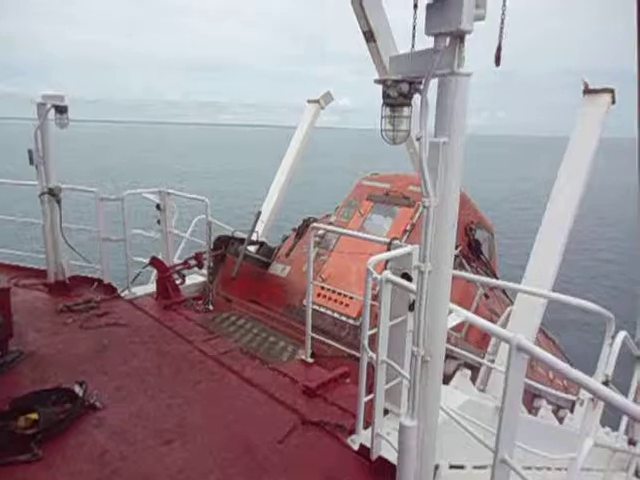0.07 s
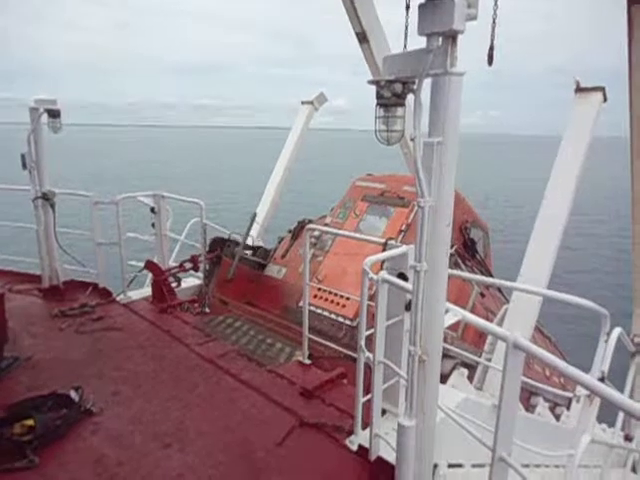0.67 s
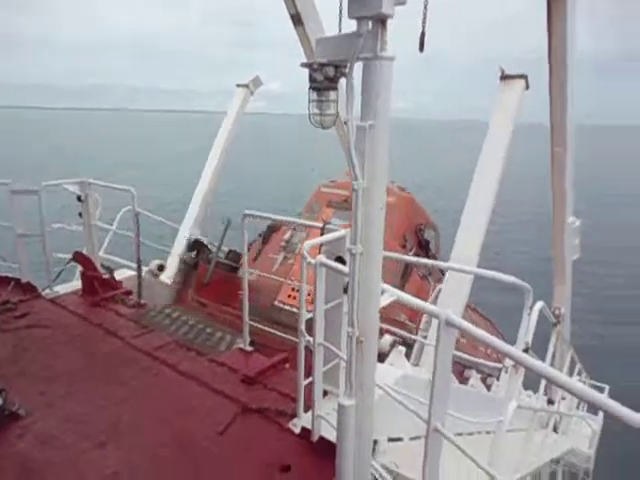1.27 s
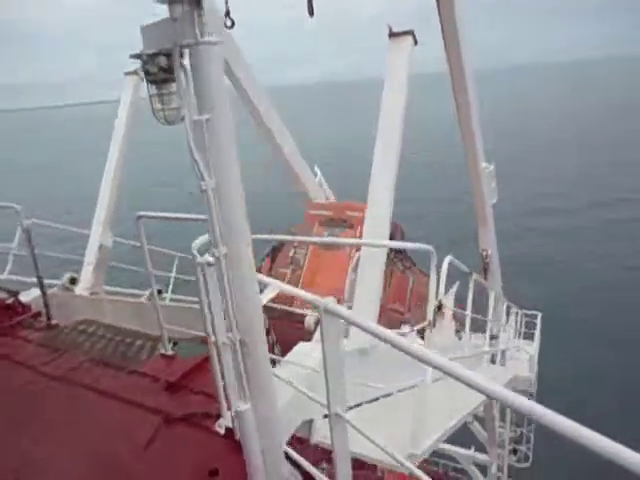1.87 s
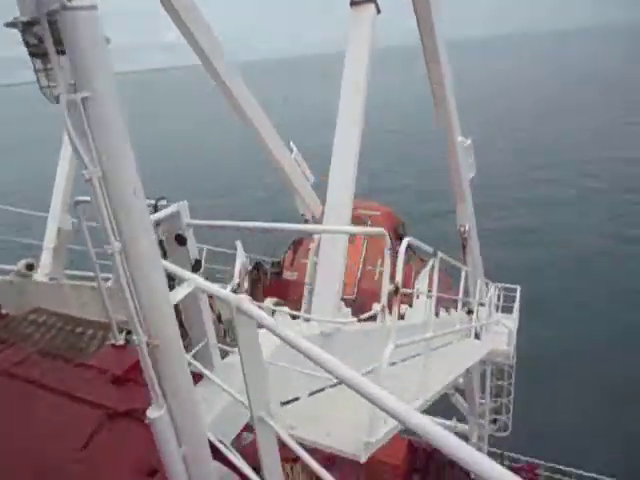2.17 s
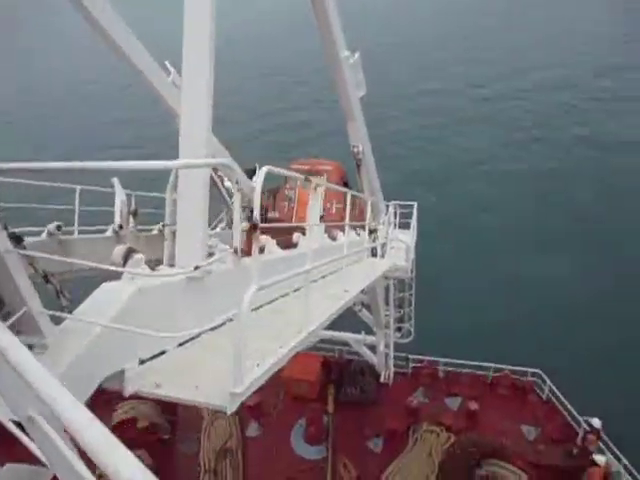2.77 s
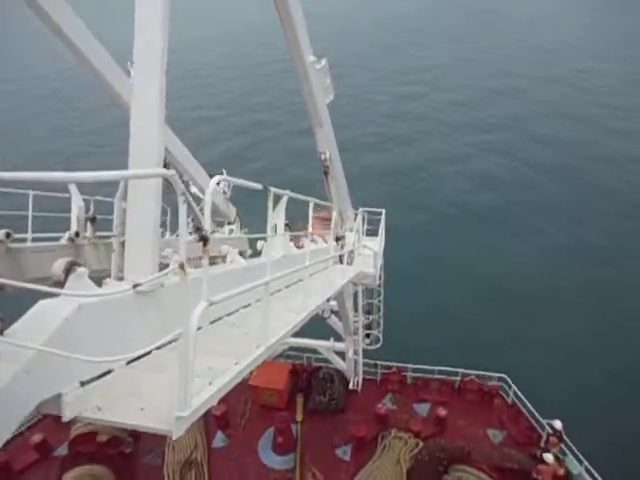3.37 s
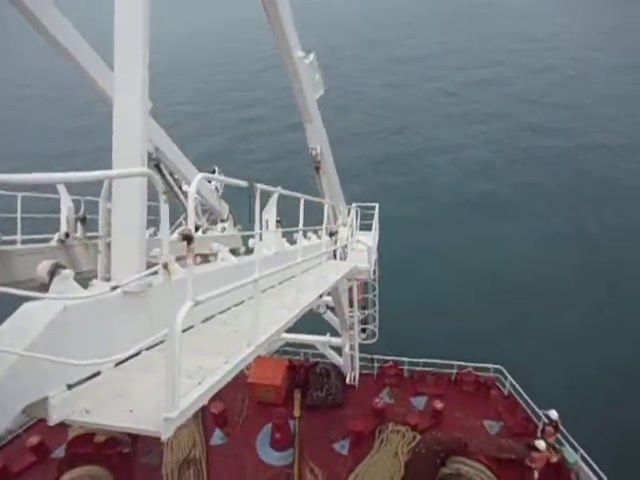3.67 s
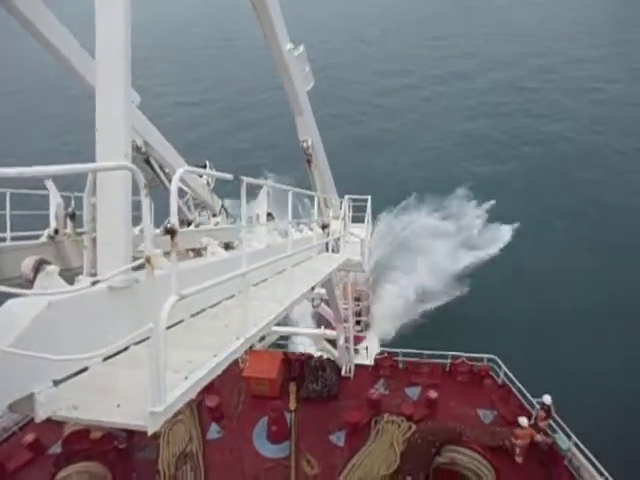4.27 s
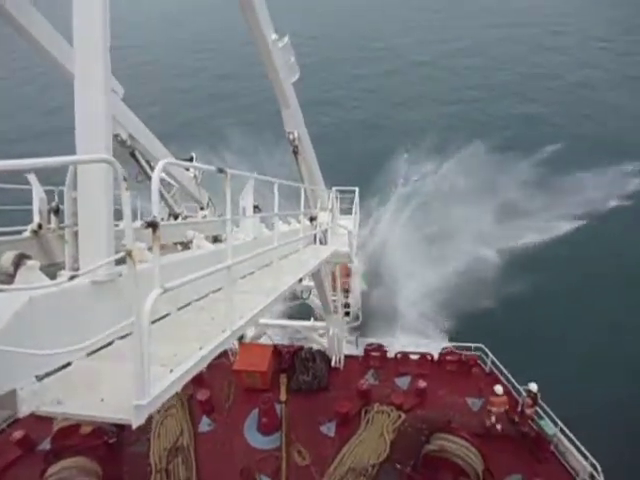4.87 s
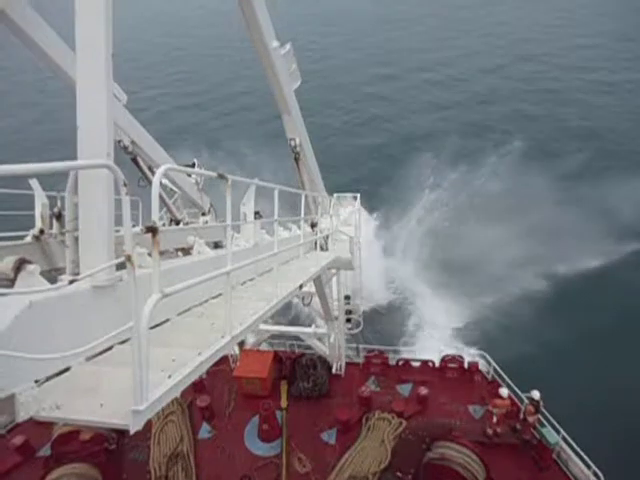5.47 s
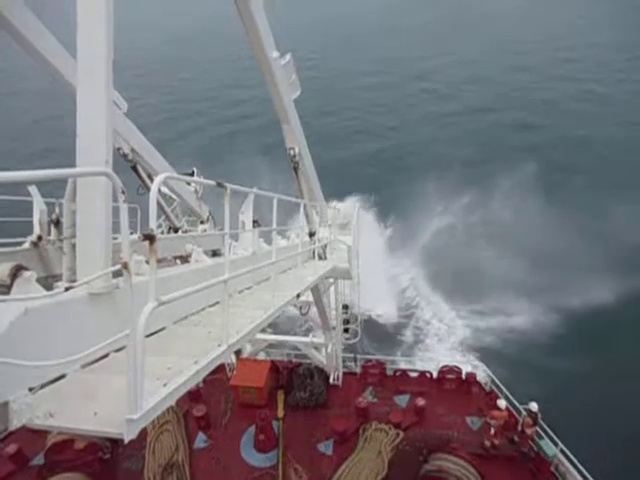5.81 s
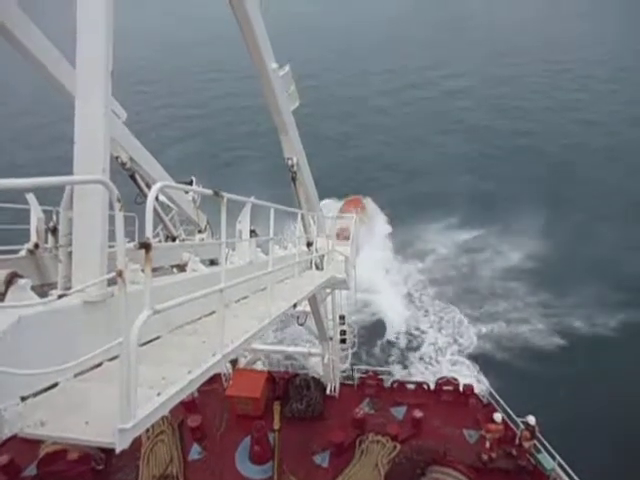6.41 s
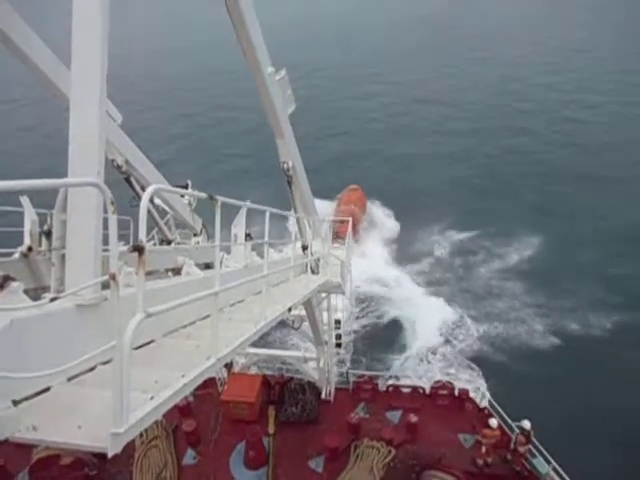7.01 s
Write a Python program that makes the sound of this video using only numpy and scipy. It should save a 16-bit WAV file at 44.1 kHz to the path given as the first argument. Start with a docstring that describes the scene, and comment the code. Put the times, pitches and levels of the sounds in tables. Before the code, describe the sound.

A low rush and short steel groans lead to a sharp clang and several smaller clanks as a lifeboat is released from a ship's stern. A rolling rumble builds, surges and fades as the boat drops. It strikes the water with a cluster of slaps and thuds, then spray falls and white water churns. Ship engines hum throughout, all heard from the deck through a small, slightly distorting microphone with little treble.

```python
"""A free-fall lifeboat is launched from a ship's stern, heard on deck through a small overloading camera.
Over the drone of the ship come a louder low rush of deck noise and groans of steel. The latch knocks, the
hook flies open with a clang as the rush fades, and loose steel clanks, each impact exciting the modes of
the metal. The hull rumbles down the ramp on its rollers, falls in near silence and slams into the sea.
Last, spray rains back as countless small impacts while white water churns behind the boat."""
import sys
import numpy as np
from scipy import signal
from scipy.fft import rfft, irfft, next_fast_len
from scipy.io import wavfile
from scipy.ndimage import uniform_filter1d, map_coordinates

SR = 44100
rng = np.random.default_rng(int(sys.argv[2]) if len(sys.argv) > 2 else 0)


def store_pcm(level_fs):
    """Save levels as 16-bit WAV."""
    pcm = np.round(np.clip(level_fs, -1, 1) * 32767).astype(np.int16)
    wavfile.write(sys.argv[1], SR, np.atleast_2d(pcm).T)


N = 319725
TIME = np.arange(N) / SR

# Engine lines. Each row: frequency in Hz, level in dB.
ENGINE_LINES = [(69, -44), (153, -44.5), (236, -42), (352, -49.5)]
# Noise spectra. Each row: frequency in Hz, relative spectral density in dB.
MACHINERY_SPECTRUM = [(15, -19), (28, -8), (45, 0.5), (70, -24.5), (110, -7.5), (160, -4), (250, -10.5),
                      (330, -19.5), (500, -15), (900, -19.5), (1450, -21), (2200, -36), (3600, -39),
                      (6000, -47.5)]
CHURN_SPECTRUM = [(15, -43), (25, -8.5), (37, -8), (76, 3), (120, 0), (204, -2), (238, 1.5), (288, -5),
                  (399, -9.5), (473, -7.5), (763, -12.5), (924, -10.5), (2140, -22.5), (2400, -26),
                  (3120, -40.5), (5280, -120)]
SPRAY_SPECTRUM = [(900, -24.5), (1800, -7.5), (2600, 3.5), (3500, 1.5), (5100, -1), (6500, -7)]
DECK_RUSH_SPECTRUM = [(15, -44), (25, -14), (70, 0), (311, -6), (835, -19), (1740, -25), (4990, -45),
                      (6000, -61), (7800, -91), (13200, -120)]
RUMBLE_SPECTRUM = [(15, -22), (30, 0), (48, -13.5), (68, -1), (110, -8.5), (170, -16.5), (250, -15.5),
                   (340, -24), (600, -30), (1500, -75)]
ROLLER_SPECTRUM = [(100, -13.5), (250, 1.5), (420, 1), (800, 2), (1000, -1.5), (1350, -2.5), (1700, -11.5),
                   (2200, -20), (3500, -30), (6000, -46.5)]
SCRAPE_SPECTRUM = [(800, -20), (1800, 0), (2700, 2.5), (4000, -2.5), (5200, -8), (6500, -11.5)]
SLAP_SPECTRUM = [(100, -11.5), (300, 4), (600, 6.5), (1000, 10), (1600, -3.5), (2600, -0.5), (4000, -7),
                 (5200, -9.5), (6500, -12)]
BOOM_SPECTRUM = [(25, -6.5), (75, 3), (150, 3.5), (220, 5.5), (320, -3), (520, -7.5), (1000, -12.5),
                 (1700, -24), (4000, -30)]
CRACK_SPECTRUM = [(150, -16), (500, 5), (1000, -2.5), (1700, 3.5), (2300, 2), (3300, -3), (4200, -2),
                  (5300, -9), (6500, -6.5)]
THUD_SPECTRUM = [(25, -20.5), (80, 1), (160, -1), (245, 9), (330, -5), (520, -4.5), (750, -13), (1400, -16),
                 (4000, -48.5)]
PLATE_SPECTRUM = [(200, -16.5), (400, 5.5), (600, -0.5), (800, -15), (1300, -8), (1800, -5.5),
                  (3000, -16.5), (6000, -49.5)]  # the crowded modes of the deck plates
# Normal modes of the steel. Each row: frequency in Hz, relative level in dB, 60 dB decay time in seconds.
HOOK_MODES = [(1613, -16, .22), (2027, -4, .31), (2100, -2, .34), (3152, -1, .32), (3304, -14, .32),
              (3921, -17, .23), (4313, -10, .23), (5055, -27, .45), (5970, -27, .5)]
RAMP_MODES = [(406, -3, .75), (451, -10, .5), (526, -1, .5), (680, -8, .65), (742, -11, .55),
              (883, -10, .35), (1157, -9, .3), (1715, -10, .3), (2283, -12, .25), (3505, -19, .45),
              (4540, -25, .4), (4807, -16, .3)]
SHACKLE_MODES = [(1077, -6, .3), (1583, -2, .5), (2019, -6, .25), (2825, -6, .3), (2895, -4, .25),
                 (3145, -10, .25), (4298, -17, .4), (4430, -10, .4)]
# Groans and squeaks of steel. Each row: centre in seconds, frequency in Hz, level in dB, width in seconds.
GROANS = [(0.475, 560, -22, 0.035), (0.505, 565, -16, 0.028), (0.775, 600, -10, 0.045),
          (0.955, 600, -17.5, 0.018), (1.017, 470, -21.5, 0.036), (1.047, 480, -22, 0.035),
          (4.16, 3330, -49, 0.06), (4.703, 3420, -47, 0.07)]
# The latch gives way under load. Each row: start in seconds, relative levels of crack and thud in dB.
LATCH_KNOCKS = [(0.412, -39, -22), (0.466, -36, -25), (0.498, -30, -24), (0.728, -32, -9), (0.7339, -7, -5),
                (0.7515, -17, 0), (0.763, -13, -13), (0.803, -2.5, 6)]
# Loose steel hits the ramp. Each row: start in seconds, then relative levels in dB of the crack
# and of the ringing of hook, ramp and shackle.
STEEL_CLANKS = [(0.878, -20, -12.5, -42, -36), (0.896, -28.5, -31, -36, -45),
                (1.0472, -23.5, -38, -37, -50), (1.0821, -14.5, -26, -17.5, -49),
                (1.202, -16.5, -32, -27.5, -28), (1.221, -20, -28, -38, -33),
                (1.2676, -15.5, -26.5, -17.5, -36), (1.345, -55, -58, -42, -31),
                (1.3805, -28, -48, -28, -25)]
# Runs of light ticking. Each row: start in seconds, length in seconds, relative level in dB.
TICK_RUNS = [(1.687, 0.47, -29.5), (3.249, 0.03, -28.5), (3.811, 0.22, -37), (4.576, 0.28, -29)]
# Single dry ticks during the slide. Each row: start in seconds, relative level in dB.
SINGLE_TICKS = [(2.156, -27), (2.1744, -25), (2.2116, -20), (2.3136, -28), (2.561, -23), (3.1706, -32)]
# The hull bumps over the ramp. Each row: centre in seconds, rumble level in dB, scrape level in dB.
HULL_BUMPS = [(1.9, -24, -58), (2.18, -18, -48), (2.43, -21, -42), (2.55, -17, -39), (2.63, -28, -40),
              (2.72, -19, -48), (3.16, -21, -43)]
# The hull meets the water. Each row: start in seconds, slap level in dB, boom level in dB.
WATER_IMPACTS = [(4.03, -32, -30), (4.0929, -18.5, -33), (4.2745, -28.5, -32), (4.3144, -26, -22.5),
                 (4.3525, -15, -18), (4.3698, -18.5, -21), (4.379, -18, -19), (4.392, -25, -24),
                 (4.492, -25.5, -29)]
# The shackle clinks on the emptied ramp. Each row: start in seconds, relative level in dB.
SHACKLE_CLINKS = [(4.379, -31), (4.492, -40)]
# Frequency response of the camera. Each row: frequency in Hz, gain in dB.
PASSBAND = [(10, -3), (25, 0.5), (5200, -1), (5550, -11), (5950, -18), (6350, -35.5), (6700, -82.5)]

# Swells. Each gives: start and end of the hold in seconds, level in dB, rise and fall in dB per second.
DECK_RUSH = (0.3, 0.75, -22, 40, 36)  # a low rush of deck noise that fades at the clang
CREEP = (1.1, 1.4, -34, 120, 130)  # the runners grate as the boat starts to move
DRUMMING = (2.45, 2.72, -19.3, 7.5, 19)  # the hull's weight passes down the ramp
SCRAPING = (2.53, 2.62, -41.3, 12, 24)  # grit under the runners
ENTRY = (4.06, 4.5, -47.8, 200, 21)  # the sheet of water thrown up by the bow
PLUME = (6.17, 6.66, -34.4, 9.3, 16.5)  # spray raining back
WAKE = (6.2, 7.25, -23.7, 5.5, 5)  # white water behind the boat


def amp(db):
    """Amplitude grows tenfold for every 20 dB."""
    return 10 ** (np.asarray(db) / 20)


def unit(x):
    """Normalisation to an rms of 1."""
    return x / np.sqrt(np.mean(x ** 2) + 1e-20)


def together(*gains):
    """Incoherent sounds add in power."""
    return np.sqrt(sum(gain ** 2 for gain in gains))


def wobble(rate):
    """Smooth random modulation: a spline through rate knots a second."""
    return map_coordinates(rng.standard_normal(int(N * rate / SR) + 4), [TIME * rate])


def swell(shape):
    """Exponential growth, a hold and exponential decay: straight lines in dB."""
    start, end, db, rise, fall = shape
    return amp(db - rise * np.maximum(start - TIME, 0) - fall * np.maximum(TIME - end, 0))


def hump(centre, width):
    """A Gaussian envelope around one moment."""
    return np.exp(-np.pi * np.minimum(np.abs(TIME - centre) / width, 10) ** 2)


def bursts(times, levels, t60, attack):
    """Envelope of damped impacts: each rises quickly and decays exponentially, and their powers add."""
    t = np.arange(int(SR * min(1.5 * t60, 1))) / SR
    shape = (amp(-60 * t / t60) * (1 - np.exp(-t / attack))) ** 2
    power = np.zeros(N + SR)
    for start, db in zip(times, levels):
        power[round(start * SR):][:len(t)] += amp(db) ** 2 * shape
    return np.sqrt(power[:N])


def filtered(x, response):
    """Linear filtering multiplies the spectrum by a frequency response."""
    size = next_fast_len(N + SR // 2)
    return irfft(rfft(x, size) * response(np.fft.rfftfreq(size, 1 / SR)), size)[:N]


def colour(x, spectrum):
    """Spectral shaping by a curve of dB against log frequency."""
    knots_hz, db = np.transpose(spectrum)
    return filtered(x, lambda hz: amp(np.interp(np.log(hz + 1), np.log(knots_hz), db)))


def rush(spectrum, patchy_db):
    """Coloured noise of rms 1, modulated in random patches of time and frequency."""
    cells = signal.stft(rng.standard_normal(N), nperseg=512)[2]
    patches = uniform_filter1d(rng.standard_normal(cells.shape), size=4, axis=0)
    patches = uniform_filter1d(patches, size=10, axis=1)
    noise = signal.istft(cells * amp(patchy_db * unit(patches)), nperseg=512)[1][:N]
    return unit(colour(noise, spectrum))


def grains(spectrum, rate, scatter_db):
    """Shot noise of rms 1: tiny impacts of random size at random moments."""
    sizes = rng.standard_normal(N) * amp(scatter_db * np.clip(rng.standard_normal(N), -2, 2))
    struck = rng.random(N) < rate / SR
    return unit(colour(sizes * struck, spectrum))


def ring(modes, times, levels, waver_rad=0.5, waver_per_s=28):
    """Modal vibration: each blow gives every mode a random share of energy, lost at the mode's own rate."""
    out = np.zeros(N)
    live = slice(int(min(times) * SR), int((max(times) + 1) * SR))
    t = TIME[live] - min(times)
    for hz, db, t60 in modes:
        strengths = levels + db + rng.standard_normal(len(times))
        envelope = bursts(times, strengths, t60, attack=0.0033)[live]
        # loose steel never rings quite purely
        waver = waver_rad * np.interp(t * waver_per_s, np.arange(128), rng.standard_normal(128))
        out[live] += envelope * np.sin(2 * np.pi * (hz * t + rng.random()) + waver)
    return out


def ship():
    """Machinery and ventilation radiate broadband noise, with wavering spectral lines from the engine."""
    hum = np.zeros(N)
    for hz, db in ENGINE_LINES:
        peak = np.sqrt(2) * amp(db + 2 * wobble(5))
        hum += peak * np.sin(2 * np.pi * hz * TIME + 0.9 * wobble(7))
    return hum + amp(-33.5) * rush(MACHINERY_SPECTRUM, patchy_db=0.5)


def splash(touch_s=4.05, rise_db_per_s=250):
    """Turbulent white water churns low, while the impacts of countless drops merge into a hiss."""
    afloat = amp(-rise_db_per_s * np.maximum(touch_s - TIME, 0))
    entry = swell(ENTRY)
    churn_gain = together(amp(16) * entry, afloat * swell(WAKE)) * amp(0.28 * wobble(12))
    churn = churn_gain * rush(CHURN_SPECTRUM, patchy_db=0.4)
    hiss = amp(0.5) * rush(SPRAY_SPECTRUM, patchy_db=1)
    drops = amp(-4.5) * grains(SPRAY_SPECTRUM, rate=3600, scatter_db=1)
    spray_gain = together(entry, afloat * swell(PLUME)) * amp(0.43 * wobble(16))
    return churn + spray_gain * (hiss + drops)


def groans():
    """Stick-slip friction under a shifting load gives short notes with weak harmonics."""
    out = np.zeros(N)
    waver = 0.5 * wobble(70)
    for centre, hz, db, width in GROANS:
        live = np.abs(TIME - centre) < 2 * width
        phase = 2 * np.pi * hz * TIME[live] + waver[live]
        note = np.sin(phase) + amp(-24.5) * np.sin(2 * phase) + amp(-17) * np.sin(3 * phase)
        out[live] += amp(db) * hump(centre, width)[live] * note
    return out


def ticks(gap_s=0.0627):
    """Brief transients have broad spectra: dry ticks in even runs, and single, mostly louder ones."""
    even = [(start + lag, db + rng.standard_normal())
            for start, length, db in TICK_RUNS for lag in np.arange(0, length, gap_s)]
    times, levels = np.transpose(even + SINGLE_TICKS)
    return bursts(times, levels - 3.5, t60=0.036, attack=0.0005) * rush(SCRAPE_SPECTRUM, patchy_db=1)


def roller_gain(start_s=1.66, full_speed_s=2.36, edge_s=2.92, db_per_decade=26, run_down_db_per_s=12):
    """Rolling noise grows as a power of speed, surges as the boat tips off the ramp, then runs down."""
    speed = np.clip((TIME - start_s) / (full_speed_s - start_s), 1e-4, 1)
    past_edge = np.maximum(TIME - edge_s, 0)
    unload_db = 1.2 * np.minimum(past_edge / 0.2, 1)
    rolling = amp(-26.7 + db_per_decade * np.log10(speed) - unload_db - run_down_db_per_s * past_edge)
    surge = amp(-24) * hump(edge_s, width=0.27)  # the last rollers carry the whole boat
    return together(rolling, surge)


def slide():
    """After a low rush of deck noise, rolling and friction: the hull drums, rollers roar, grit scrapes."""
    creep = swell(CREEP)
    jolts = sum(amp(db) * hump(centre, width=0.08) for centre, db, _ in HULL_BUMPS)
    scuffs = sum(amp(db) * hump(centre, width=0.08) for centre, _, db in HULL_BUMPS)
    deck_rush = swell(DECK_RUSH) * rush(DECK_RUSH_SPECTRUM, patchy_db=1.5)
    rumble = together(swell(DRUMMING), jolts) * rush(RUMBLE_SPECTRUM, patchy_db=0.5)
    roar = together(creep, roller_gain()) * rush(ROLLER_SPECTRUM, patchy_db=1.4)
    grit = grains(SCRAPE_SPECTRUM, rate=9000, scatter_db=3)
    scrape = together(amp(-7) * creep, swell(SCRAPING), scuffs) * grit
    judder_db = 1.15 * wobble(35)  # all four flicker in level together
    return amp(judder_db) * (deck_rush + rumble + roar + scrape)


def slam():
    """Water impact: the bow slaps and the belly booms, while the shackle clinks on the ramp."""
    times, slap_db, boom_db = np.transpose(WATER_IMPACTS)
    direct = bursts(times, slap_db, t60=0.04, attack=0.0005)
    echo = bursts(times, slap_db - 21, t60=0.51, attack=0.011)  # from the ship's stern
    slap = (direct + echo) * rush(SLAP_SPECTRUM, patchy_db=2)
    boom = bursts(times, boom_db, t60=0.28, attack=0.001) * rush(BOOM_SPECTRUM, patchy_db=0.5)
    return slap + boom + ring(SHACKLE_MODES, *np.transpose(SHACKLE_CLINKS))


def hook_chatter(count=5, start_s=0.8111, gap_s=0.0122, scatter_s=0.001, loss_db=6.2):
    """Inelastic rebound: the hook loses energy at each contact with its stop. One row per contact."""
    contact = np.arange(count)
    times = start_s + gap_s * contact + scatter_s * rng.standard_normal(count) * (contact > 0)
    first_db = np.array([19, 1, -28, 6, -27])  # crack, thud, ramp, hook, shackle
    return np.column_stack([times, first_db - loss_db * contact[:, None]])


def release():
    """Impact excitation: latch, hook and loose steel crack, thud through the deck and ring the metal."""
    knocks = [(start, crack, thud, crack - 9) for start, crack, thud in LATCH_KNOCKS]
    clanks = [(start, crack, crack - 3, ramp, hook, shackle)
              for start, crack, hook, ramp, shackle in STEEL_CLANKS]
    blows = np.vstack([hook_chatter(), clanks])
    blow_times, *_, hook_db, shackle_db = blows.T
    hook = ring(HOOK_MODES, blow_times, hook_db)
    shackle = ring(SHACKLE_MODES, blow_times, shackle_db + 1.5)
    # the latch's dull knocks join in for all but the ringing of hook and shackle
    times, crack_db, thud_db, ramp_db = np.vstack([knocks, blows[:, :4]]).T
    contact = bursts(times, crack_db + 1.5, t60=0.055, attack=0.0003)
    scatter = bursts(times, crack_db - 17, t60=0.22, attack=0.007)  # from the steelwork around
    crack = (contact + scatter) * rush(CRACK_SPECTRUM, patchy_db=2.5)
    thud = bursts(times, thud_db, t60=0.17, attack=0.0014) * rush(THUD_SPECTRUM, patchy_db=4)
    plates = bursts(times, ramp_db, t60=0.28, attack=0.002) * rush(PLATE_SPECTRUM, patchy_db=3)
    return crack + thud + plates + ring(RAMP_MODES, times, ramp_db) + hook + shackle


def scene():
    """Superposition: the pressures of all sources add at the deck."""
    return (ship() + release() + groans() + slide() + ticks() + slam() + splash())[None]


def record(dry, overload=0.69, start_s=0.345, top_hz=15800):
    """Saturation and band limiting in the camera, which is silent until start_s."""
    saturated = dry[0] / (1 + np.abs(dry[0] / overload) ** 6) ** (1 / 6)
    clipped = np.clip(colour(saturated, PASSBAND), -0.7, 0.7)  # the filter's overshoot clips again
    gate = np.clip((TIME - start_s) / 0.002, 0, 1)
    return filtered(clipped * gate, lambda hz: hz < top_hz)[None]


dry = scene()
out = record(dry)
store_pcm(out)
```